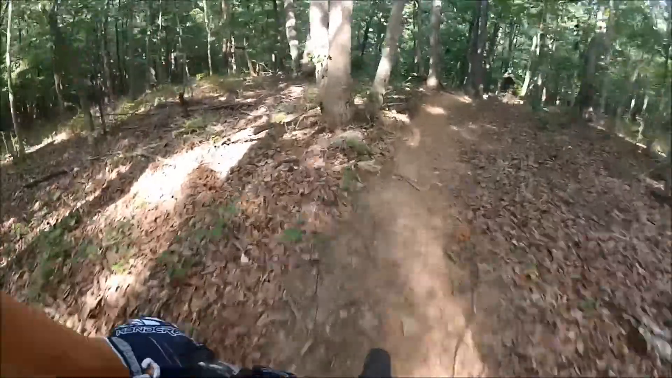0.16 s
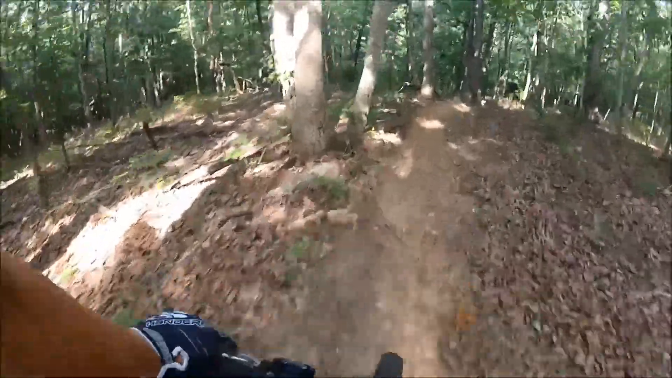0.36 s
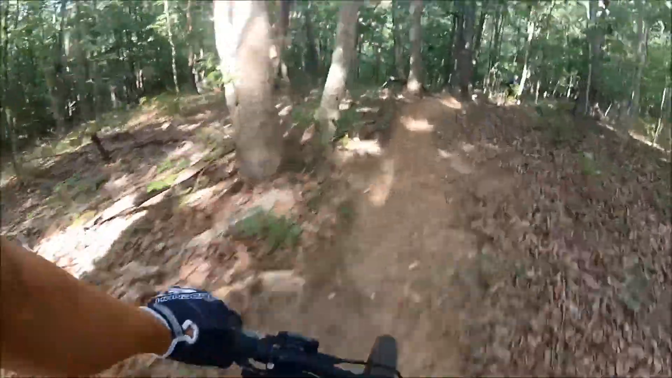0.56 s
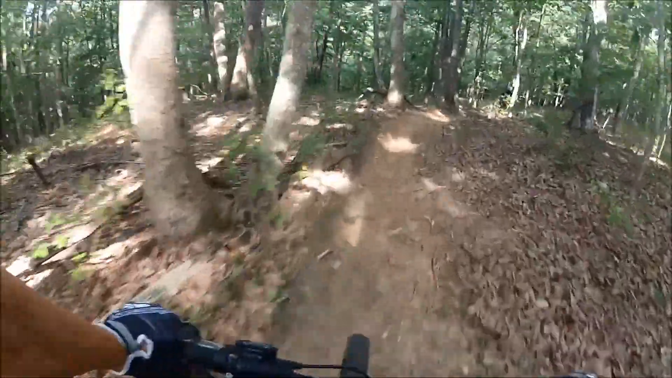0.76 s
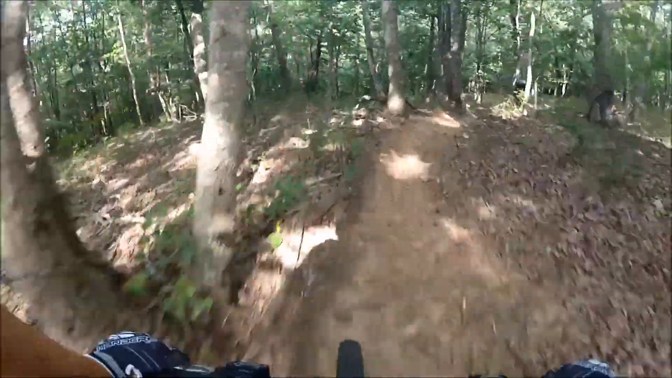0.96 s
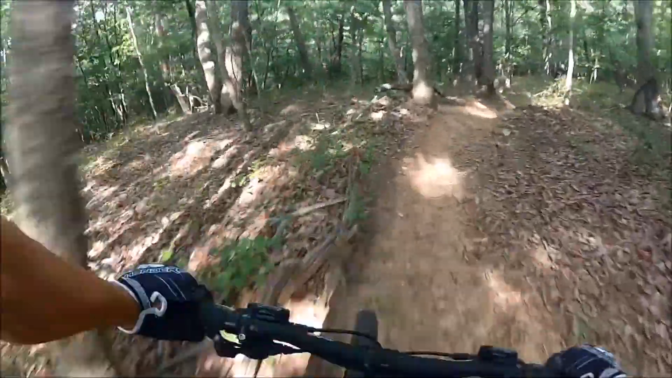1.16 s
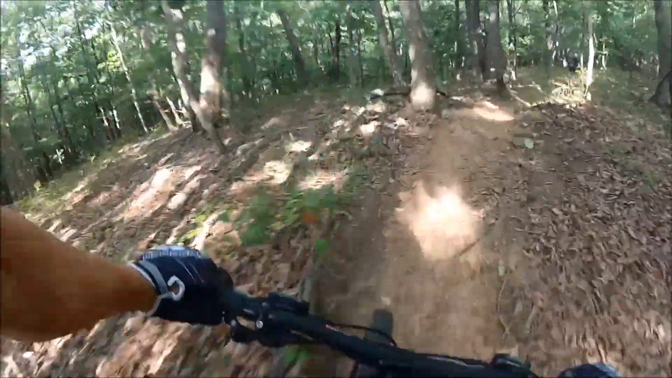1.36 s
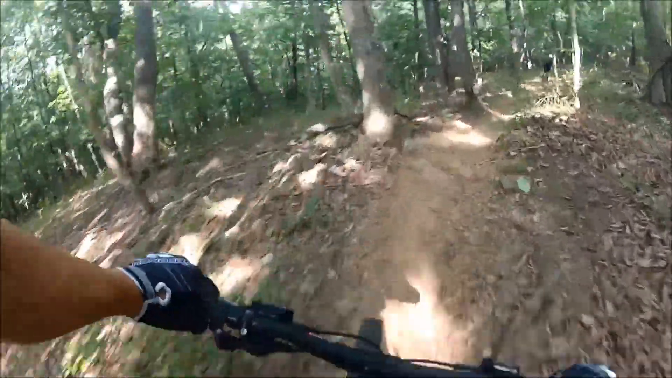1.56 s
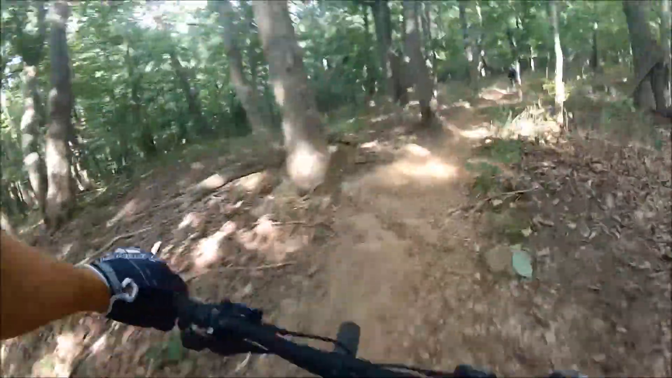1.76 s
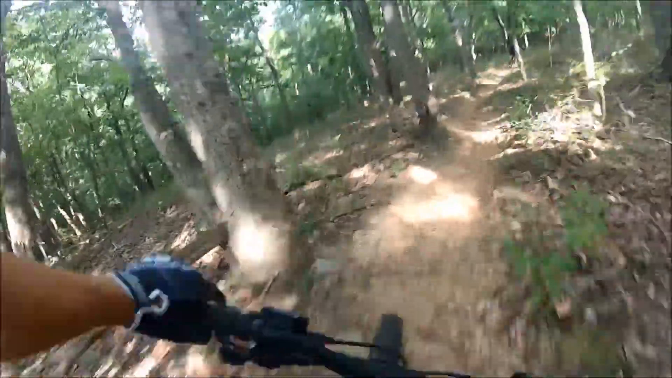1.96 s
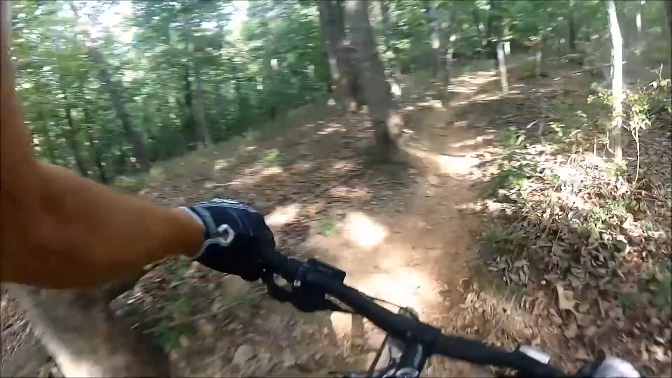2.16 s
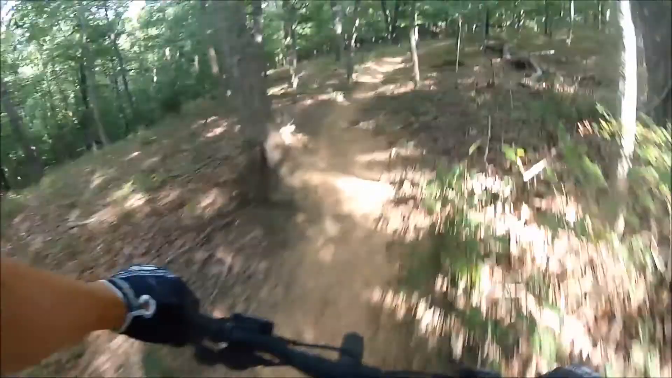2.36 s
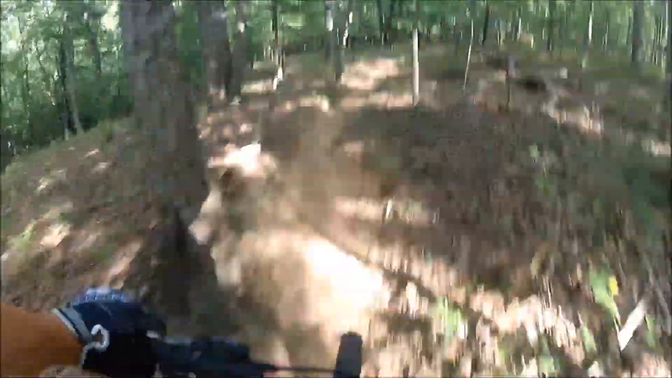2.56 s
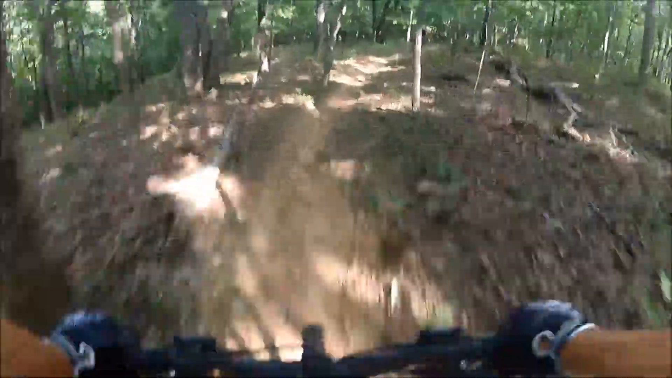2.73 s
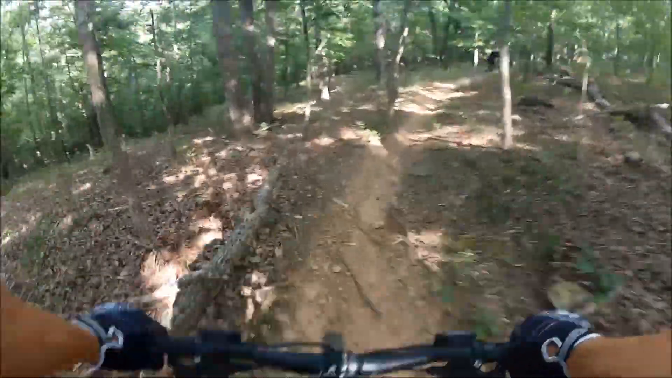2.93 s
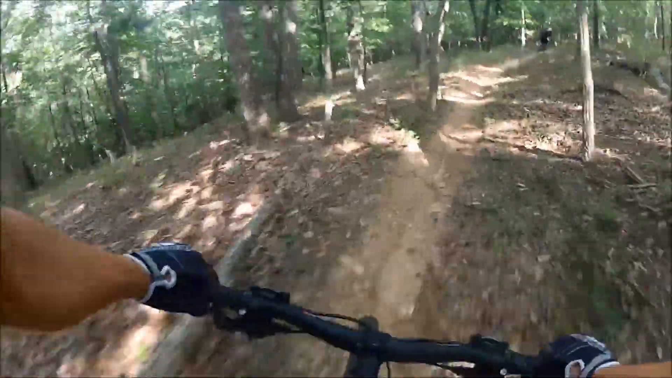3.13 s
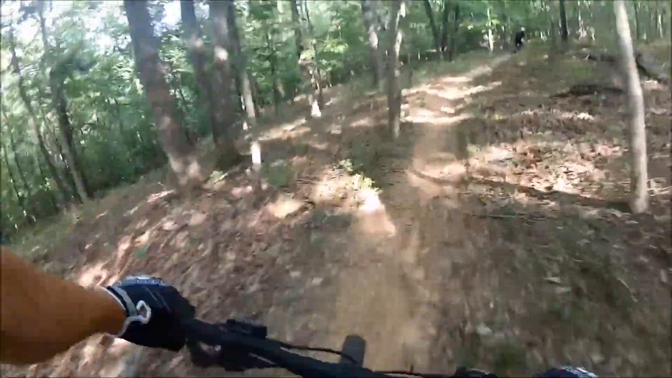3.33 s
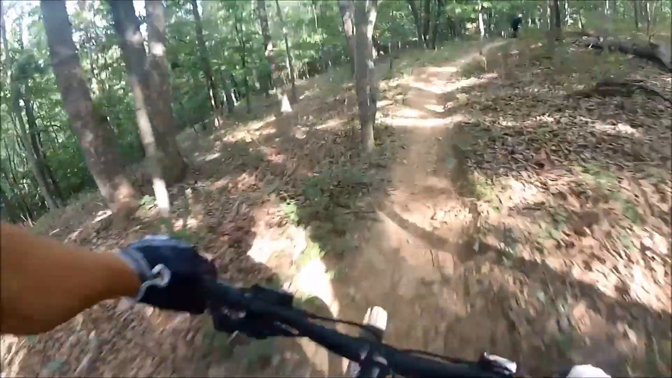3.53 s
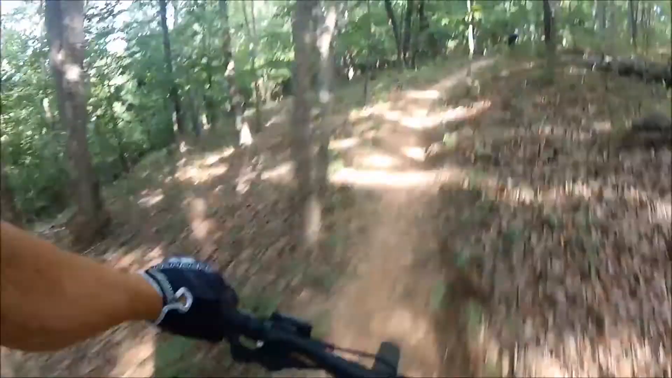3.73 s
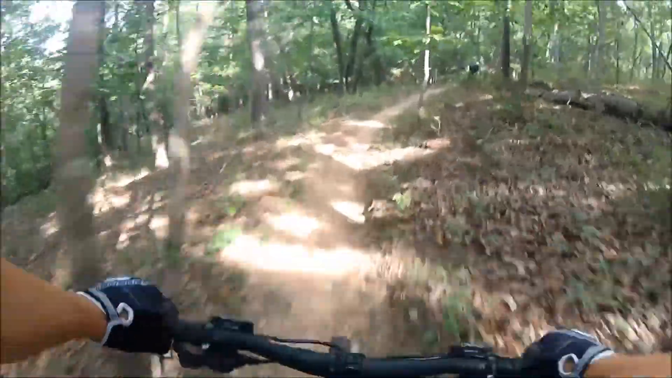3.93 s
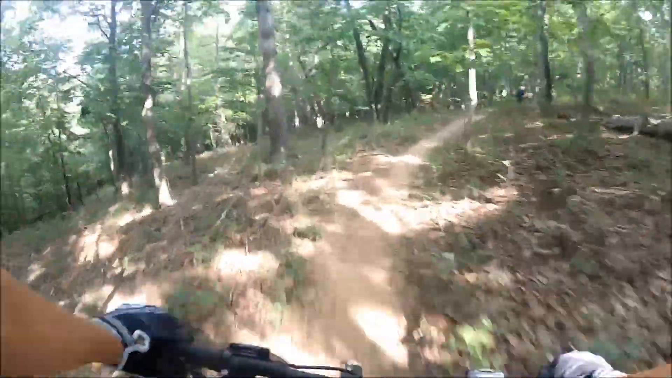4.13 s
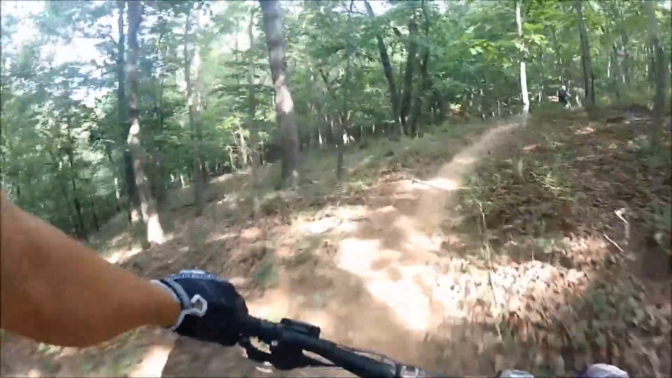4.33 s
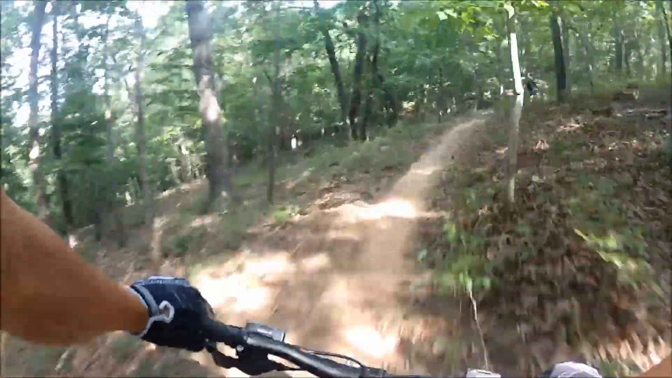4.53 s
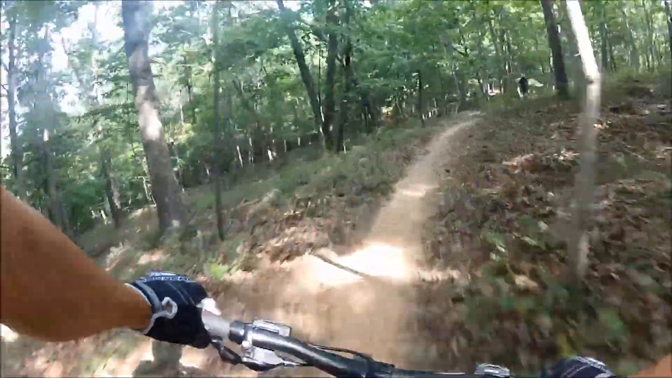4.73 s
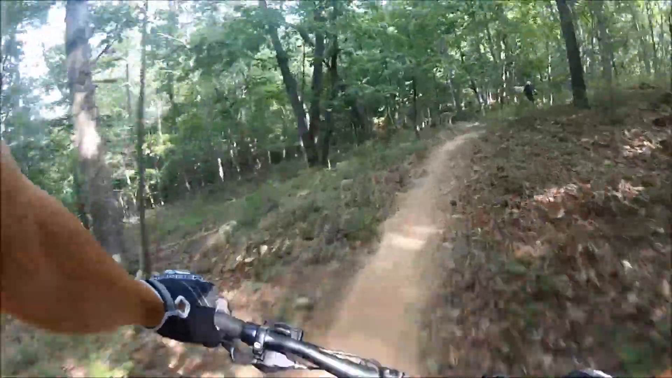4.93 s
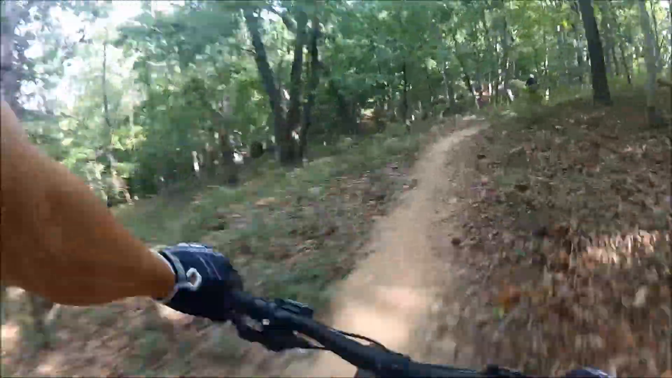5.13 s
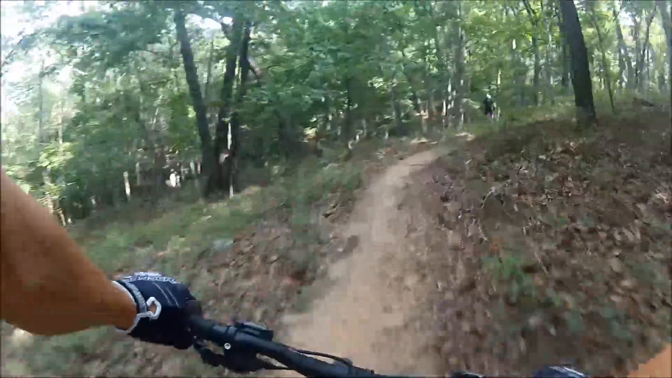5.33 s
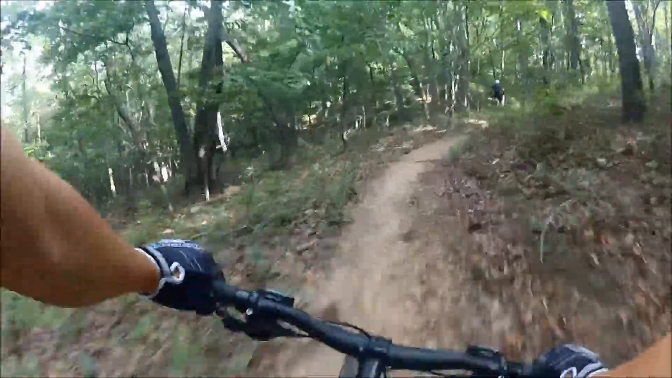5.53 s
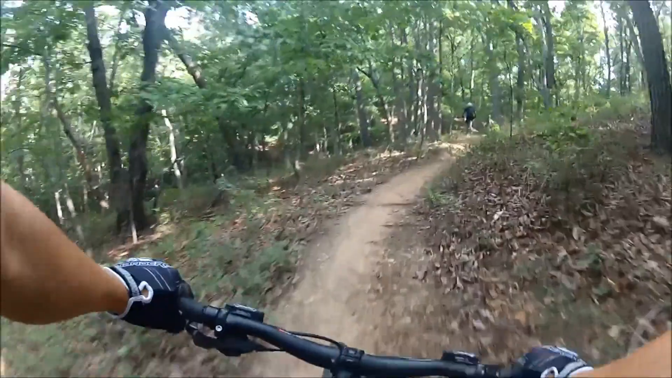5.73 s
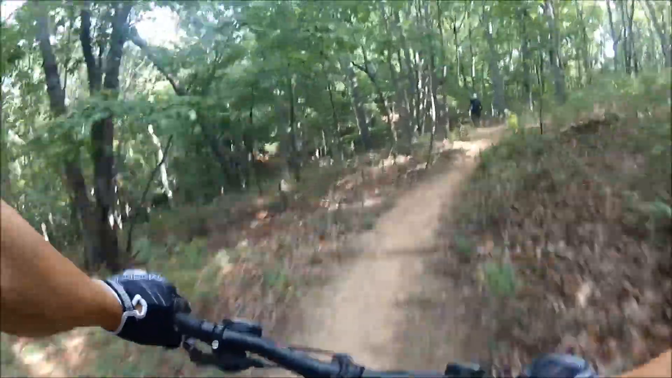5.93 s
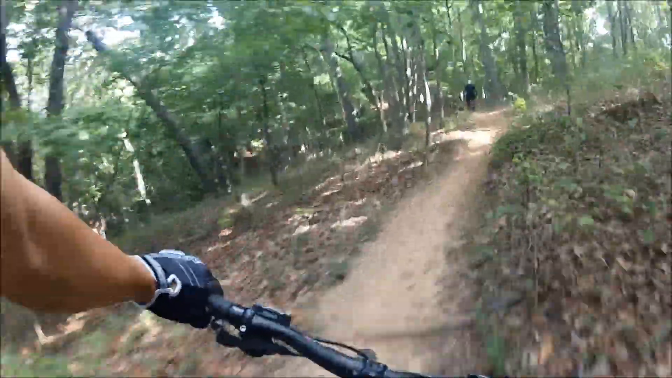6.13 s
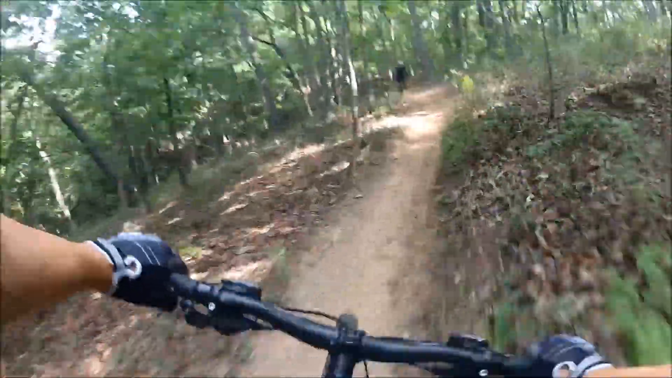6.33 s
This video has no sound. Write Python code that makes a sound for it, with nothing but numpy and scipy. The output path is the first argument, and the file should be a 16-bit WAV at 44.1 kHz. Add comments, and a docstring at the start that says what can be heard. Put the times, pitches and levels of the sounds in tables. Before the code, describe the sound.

A mountain bike descends a dirt forest trail. Gritty tyre crunch opens loud and quickly eases; the loose mount clacks now and then. Around two seconds roots hit in rapid deep thuds, with snapping debris, scuffs and wind buffeting. After more bumps near three seconds it settles into quieter dusty rolling, coasting clicks blurred into a whirr and scattered light knocks. Mono, close, dry, muffled on top.

```python
"""A dirt trail in the woods, ridden downhill on a mountain bike, heard from a microphone worn by the rider.
Tyres: grains and pebbles excite resonances over dust hiss and a lumpy low rumble; splinter bursts snap,
slipping knobs scuff, leaves swish. The freehub whirrs as noisy clicks in spells of coasting.
Roots thump the mount and the loose mount clacks, both as modal blows; wind is low noise with gusts."""
import sys
import numpy as np
from scipy import signal
from scipy.fft import rfft, irfft, next_fast_len
from scipy.io import wavfile

SR = 44100
rng = np.random.default_rng(int(sys.argv[2]) if len(sys.argv) > 2 else 0)


def file_out(sig):
    """Save sig as 16-bit WAV at sys.argv[1]."""
    # one column per channel
    cols = np.atleast_2d(sig).T
    # limit, then scale
    lim = np.clip(cols, -1, 1)
    pcm = np.round(lim * 32767).astype(np.int16)
    wavfile.write(sys.argv[1], SR, pcm)


N = 286209
TIME = np.arange(N) / SR   # s

# resonances of wheel and frame that grit excites: centre_hz, width_hz, level_db
GRIT_MODES = [(705, 670, -15.5), (1047, 175, -3), (1550, 470, -13.5), (1918, 163, 3.5), (2280, 144, 1),
              (2494, 57, 1.5), (2740, 61, -7.5), (3275, 115, -7), (3590, 143, -4), (4630, 810, -15)]


def from_db(db):
    """Decibels to amplitude gain."""
    return 10 ** (np.asarray(db) / 20)


def rms_one(x):
    """Scale to unit rms."""
    return x / np.sqrt(np.mean(x ** 2) + 1e-20)


def curve(rows):
    """Interpolate (time, value) rows linearly at every sample."""
    s, values = np.transpose(rows)
    return np.interp(TIME, s, values)


def add(track, start_s, sound):
    """Mix a sound in at a time."""
    at = max(round(start_s * SR), 0)
    track[at:at + len(sound)] += sound[:max(N - at, 0)]


def drift(rate_hz, step=40, settle=2000):
    """Slow random drift of unit rms: white noise through a double-pole low-pass at a reduced rate."""
    r = np.exp(-2 * np.pi * rate_hz * step / SR)
    white = rng.standard_normal(N // step + settle + 2)
    slow = signal.lfilter([1], [1, -2 * r, r * r], white)[settle:]
    return np.interp(np.arange(N) / step, np.arange(len(slow)), rms_one(slow))


def noise(spectrum):
    """Unit-rms noise shaped by (Hz, dB) points, falling 12 dB per octave outside them."""
    hz, db = np.transpose(spectrum)
    size = next_fast_len(N)
    bins_hz = np.maximum(np.fft.rfftfreq(size, 1 / SR), 1)
    gain = from_db(np.interp(np.log(bins_hz), np.log(hz), db))
    gain *= np.minimum(bins_hz / hz[0], 1) ** 2
    gain *= np.minimum(hz[-1] / bins_hz, 1) ** 2
    return rms_one(irfft(rfft(rng.standard_normal(size)) * gain, size)[:N])


def resonate(x, modes):
    """Parallel two-pole resonances with alternating signs."""
    out = 0
    for k, (hz, width_hz, db) in enumerate(modes):
        r = np.exp(-np.pi * width_hz / SR)
        poles = [1, -2 * r * np.cos(2 * np.pi * hz / SR), r * r]
        band = signal.lfilter([1, 0, -1], poles, x + 1e-18)   # offset avoids denormals
        out = out + (-1) ** k * from_db(db) * (1 - r * r) / 2 * band
    return out


def swells(events):
    """Envelope of Gaussian swells: (centre s, sigma s, peak dB)."""
    return sum(from_db(db) * np.exp(-.5 * ((TIME - s) / sigma_s) ** 2) for s, sigma_s, db in events)


def by_chance(per_s, db, spread_db=2.0, count=64):
    """Small events at random moments: (s, dB), with exponential gaps and uniform level spread."""
    draws = rng.random((count, 2))
    times_s = np.cumsum(-np.log(1 - draws[:, 0]) / per_s)
    return [(s, db + spread_db * (2 * u - 1)) for s, u in zip(times_s, draws[:, 1]) if s < N / SR]


def grit(modes, per_s, size_spread_db, patchy_db, patch_rate_hz):
    """Grains crack under the knobs, sizes spread exponentially in dB; each favours other resonances."""
    falls = rng.random(N) < per_s / SR
    sizes = from_db(size_spread_db * np.minimum(rng.exponential(1, N), 4)) * falls
    out = 0
    for mode in modes:
        strength = rng.standard_normal(N) * from_db(patchy_db * drift(patch_rate_hz))
        out = out + resonate(sizes * strength, [mode])
    return rms_one(out)


def blows(events, modes, lag_at_100hz_s, vary_db=1.5, low_cut_hz=22, size=8192):
    """Blows on a body, each favouring other modes; bending waves carry highs faster: a downward chirp."""
    hz = np.fft.rfftfreq(size, 1 / SR)
    rings = []
    for k, (mode_hz, db, t60_s) in enumerate(modes):
        damped = 2j * np.pi * hz + np.log(1000) / t60_s
        rings.append((-1) ** k * from_db(db) * mode_hz / (damped ** 2 + (2 * np.pi * mode_hz) ** 2))
    rings = np.array(rings)
    travel = np.exp(-4j * np.pi * lag_at_100hz_s * np.sqrt(100 * hz))   # delay goes as 1 / sqrt(hz)
    radiated = 1j * hz / (1j * hz + low_cut_hz)
    strengths = from_db(vary_db * rng.standard_normal((len(events), len(modes))))
    out = np.zeros(N)
    for (s, peak_db, contact_hz), strength in zip(events, strengths):
        contact = 1 / (1 + 1j * hz / contact_hz) ** 2   # a soft contact is dull
        blow = irfft(strength @ rings * travel * radiated * contact)
        add(out, s, from_db(peak_db) * blow / np.abs(blow).max())
    return out


def tyres(grip_db, clump_db=2.0, clump_rate_hz=45, grit_db=-1.0, pebble_db=-7.5, dust_db=-6.0):
    """Coarse grit and pebbles come in clumps over the smoother hiss of dust."""
    # dust hiss: freq_hz, density_db
    dust = [(300, -2), (550, 3.5), (950, 0.5), (1300, -2.5), (1900, 3.5), (2500, -19), (3000, -11.5),
            (3700, 2.5), (4300, -25), (5800, -17)]
    crunch_db = -55 + 0.97 * grip_db   # level at average grip; share of its swing
    clumps = rms_one(from_db(clump_db * drift(clump_rate_hz)))
    coarse = from_db(grit_db) * grit(GRIT_MODES, per_s=2200, size_spread_db=2.0, patchy_db=4.5,
                                     patch_rate_hz=22.5)
    stones = from_db(pebble_db) * pebbles()
    fine = from_db(dust_db) * noise(dust)
    return from_db(crunch_db) * (clumps * (coarse + stones) + fine)


def pebbles(per_s=260, low_hz=1600, high_hz=3900, width_hz=70, tilt_db=-4.5, count=24):
    """Small stones tick on the wheels, each ringing briefly at one of a fan of pitches."""
    ticks = rng.standard_normal(N) * (rng.random(N) < per_s / SR)
    dealt = rng.integers(0, count, N)
    pitches_hz = np.geomspace(low_hz, high_hz, count)
    levels_db = np.linspace(0, tilt_db, count)
    out = 0
    for k, (hz, db) in enumerate(zip(pitches_hz, levels_db)):
        out = out + resonate(ticks * (dealt == k), [(hz, width_hz, db)])
    return rms_one(out)


def rumble(lump_db=4.0, lump_rate_hz=14):
    """Uneven ground shakes the tyres: low noise in lumps, louder on rougher stretches."""
    # tyre rumble: freq_hz, density_db
    spectrum = [(40, -5), (70, -5), (110, 1.5), (170, -0.5), (270, -5.5), (380, -12), (550, -17.5),
                (950, -22), (1300, -30.5), (3000, -39)]
    # rumble on rougher and smoother ground: time_s, level_db
    ground = [(0.0, -43), (0.42, -48.5), (0.78, -46), (1.15, -50.5), (2.1, -45.5), (2.35, -39),
              (2.55, -42.5), (3.2, -45.5), (3.6, -47.5), (3.9, -44.5), (4.4, -51), (4.9, -46), (5.3, -44.5),
              (5.8, -46), (6.49, -43)]
    lumps = from_db(lump_db * drift(lump_rate_hz))
    return from_db(curve(ground)) * rms_one(noise(spectrum) * lumps)


def snaps(grip_db, t60_s=0.031, ring_db=-3.0, size=2048):
    """Stones and twigs snap: each a decaying noise burst through a wheel ring and a sharp crack."""
    # snaps under the tyres: start_s, level_db, crack_db (relative)
    events = [(0.0508, -28, -11), (0.0654, -33, -7), (0.2718, -40, -5), (0.5691, -37, -18),
              (1.0615, -32.5, -23), (1.1553, -35, -22), (1.4301, -35.5, -9), (1.996, -32, -28),
              (2.1819, -35, -26), (2.2284, -31.5, -12), (2.2573, -33.5, -4.5), (2.2977, -26, -28),
              (2.4843, -38, -2), (2.5152, -27.5, -21), (2.58, -34, -8), (2.606, -34, -3),
              (2.7317, -34, -10), (2.8689, -35.5, -18), (3.0624, -33.5, -16), (3.249, -33, -24),
              (3.3767, -31.5, -25), (3.4376, -30, -8), (3.5803, -32, -19), (3.8761, -32.5, -30)]
    # sharp crack: centre_hz, width_hz, level_db
    crack_modes = [(4260, 1350, 0.02), (5500, 2500, -2)]
    chips = [(s, db + grip_db[int(s * SR)], -18) for s, db in by_chance(per_s=4.0, db=-41.5)]
    events = list(events) + chips
    decay = from_db(-60 * TIME[:size] / t60_s)
    out = np.zeros(N)
    for (s, level_db, crack_db), splinters in zip(events, rng.standard_normal((len(events), size))):
        burst = splinters * decay
        ring = resonate(burst, GRIT_MODES)
        crack = resonate(burst, crack_modes)
        sound = from_db(ring_db) * ring / np.abs(ring).max()
        sound += from_db(crack_db) * crack / np.abs(crack).max()
        add(out, s, from_db(level_db) * sound)
    return out


def scuffs(per_s=1800):
    """Slipping knobs grind many grains at once: dense grit in short swells."""
    # slips: centre_s, sigma_s, peak_db
    slips = [(.1, 0.015, -42.5), (.177, 0.017, -43), (.552, 0.013, -50.5), (1.587, 0.0042, -45.5),
             (1.935, .0084, -47), (2.292, 0.018, -39.5), (2.345, .012, -43), (2.399, 0.0064, -42.5),
             (2.519, 0.014, -51), (2.604, 0.038, -44.5), (2.84, .015, -47), (3.012, 0.015, -46.5),
             (3.073, 0.011, -44.5), (3.32, 0.0086, -43), (3.475, 0.027, -46), (5.582, 0.015, -47),
             (5.958, 0.01, -46), (6.023, 0.015, -46), (6.117, 0.024, -49.5), (6.316, 0.0043, -43),
             (6.441, 0.012, -44)]
    # scuff resonances: centre_hz, width_hz, level_db
    modes = [(600, 470, -2.5), (1010, 140, -6.5), (1450, 200, -4.5), (1840, 140, 1.5), (2326, 48, -0.5),
             (2840, 170, -9), (3170, 69, -6), (3586, 94, -2)]
    return swells(slips) * grit(modes, per_s, size_spread_db=0.0, patchy_db=3.0, patch_rate_hz=56)


def thuds():
    """Roots and bumps jolt the mount, which rings in damped low modes."""
    # jolts: start_s, peak_db, contact_cutoff_hz
    jolts = [(0.329, -29, 70), (0.7805, -12.5, 138), (1.955, -9.5, 240), (2.187, -6, 206),
             (2.2346, -17, 70), (2.2623, -8.5, 377), (2.2801, -20, 400), (2.3, -18, 70),
             (2.3295, -9.5, 205), (2.3596, -18.5, 70), (2.3814, -6, 296), (2.8276, -25, 171),
             (2.9397, -12.5, 220), (3.1333, -14, 239), (3.3112, -25.5, 340)]
    # mount modes: freq_hz, level_db, t60_s
    modes = [(101.2, -2.5, 0.056), (170, 5.5, 0.0075), (279.5, -2.5, 0.035), (600, -21.5, 0.018),
             (750, -25.5, 0.033), (1087, -20, 0.077)]
    return blows(jolts, modes, lag_at_100hz_s=0.00338)


def clacks(ref_hz=1070, ref_db=-25.5, db_per_octave=5.0):
    """Short, bright knocks of the microphone mount; the harder the hit, the brighter the contact."""
    # knocks: start_s, peak_db
    knocks = [(0.2589, -29.5), (0.7635, -19.5), (0.9335, -21), (1.1946, -19), (1.317, -19.5), (1.3705, -27),
              (1.5219, -30.5), (1.6009, -31), (1.6598, -18.5), (1.9562, -20.5), (2.1056, -26.5),
              (2.1885, -23), (2.383, -23), (2.7906, -31), (3.4117, -25), (4.1549, -26), (4.3272, -22.5),
              (4.592, -22), (4.7756, -23.5), (4.8399, -26.5), (5.1106, -28), (5.1607, -28.5),
              (5.4834, -26.5), (5.7414, -24), (5.8882, -29.5), (5.9291, -28.5), (6.2464, -27),
              (6.3129, -23), (6.3739, -27)]
    # clack modes: freq_hz, level_db, t60_s
    modes = [(138, -4.5, 0.039), (277, -3.5, 0.032), (480, 1.3, 0.0045), (917, -5.5, 0.0095),
             (1870, -9.5, 0.0052)]
    knocks = list(knocks) + by_chance(per_s=2.0, db=-36)   # faint clacks in between
    events = [(s, db, ref_hz * 2 ** ((db - ref_db) / db_per_octave)) for s, db in knocks]
    return blows(events, modes, lag_at_100hz_s=.0011)


def freehub(clicks_per_s=420, wobble=.08, click_decay=2.4, patchy_db=2.5, patch_rate_hz=20):
    """Pawls skip over the ratchet so fast that the clicks blur to a whirr of shifting colour."""
    # hub resonances: centre_hz, width_hz, level_db
    modes = [(930, 130, 2), (1926, 170, 0), (2280, 106, 4), (2482, 110, 3), (2760, 47, -11.5),
             (3615, 81, -2.5)]
    teeth = np.cumsum(clicks_per_s * (1 + wobble * drift(2))) / SR
    scrapes = np.exp(-click_decay * (teeth % 1))   # decay per click period
    out = 0
    for mode in modes:
        band = resonate(scrapes * rng.standard_normal(N), [mode])
        out = out + band * from_db(patchy_db * drift(patch_rate_hz))
    return rms_one(out)


def coasting(rise_s=0.25, fade_s=0.17):
    """Freehub gain: the rider stops pedalling, and each spell rises, holds and fades exponentially."""
    # coasting spells: start_s, end_s, level_db
    spells = [(0.0, 0.5, -61.5), (1.75, 2.044, -54.5), (2.9, 3.96, -56.5), (4.203, 4.798, -53),
              (5.357, 5.9, -57.5)]
    gains = []
    for start_s, end_s, db in spells:
        rise = np.minimum(TIME - start_s, 0) / rise_s
        fade = np.maximum(TIME - end_s, 0) / fade_s
        gains.append(from_db(db) * np.exp(rise - fade))
    return np.max(gains, axis=0)


def leaves():
    """Dry leaves swish past the wheels, each a thin hiss."""
    # swishes: centre_s, sigma_s, peak_db
    swishes = [(2.436, 0.0072, -53), (2.859, .003, -48), (3.97, 0.012, -62), (4.022, 0.0049, -55),
               (6.4, 0.016, -55), (6.443, 0.0054, -46.5)]
    # leaf hiss: freq_hz, density_db
    spectrum = [(3000, -28), (4500, -2), (5500, 2), (5900, 2)]
    return swells(swishes) * noise(spectrum)


def wind(grip_db, flutter_db=2.0, flutter_rate_hz=6, gust_sigma_s=0.037):
    """The headwind flutters on the microphone and swells in gusts."""
    # wind: freq_hz, density_db
    spectrum = [(15, -1.5), (25, 3), (38, -4), (70, -12.5), (120, -14.5), (300, -48)]
    # gusts: centre_s, peak_db
    gust_rows = [(0.35, -41), (1.25, -39), (1.75, -39), (2.24, -35), (2.38, -24), (2.73, -31),
                 (2.97, -31.5), (3.13, -38), (3.33, -32.5), (3.56, -43), (5.04, -34), (5.67, -38),
                 (6.03, -40.5)]
    steady_db = -46.5 + 0.5 * grip_db   # level at average grip; share of its swing
    steady = from_db(steady_db + flutter_db * drift(flutter_rate_hz))
    gusts = swells([(s, gust_sigma_s, db) for s, db in gust_rows])
    return np.hypot(steady, gusts) * noise(spectrum)


def scene():
    """All sources travel with the rider, close and dry; crunch, small snaps and wind rise with grip."""
    # how hard the tyres work the dirt (only the swing about the mean counts): time_s, level_db
    grip = [(0.0, -62.5), (0.03, -64.5), (0.2, -70.5), (0.81, -71), (1.57, -71), (2.02, -68), (2.28, -64),
            (2.4, -62.5), (2.82, -66.5), (3.07, -68), (3.49, -68), (4.1, -71), (4.43, -69.5), (4.77, -71),
            (5.04, -73.5), (6.49, -70)]
    grip_db = curve(grip)
    grip_db = grip_db - grip_db.mean()
    trail = tyres(grip_db) + rumble() + snaps(grip_db) + scuffs() + leaves()
    bike_and_mount = thuds() + clacks() + coasting() * freehub()
    return (trail + bike_and_mount + wind(grip_db))[None]


def record(dry):
    """Hold the sound in steps at 12 kHz, which mirrors it faintly into the treble; then cut the top."""
    narrow_sos = signal.ellip(10, .1, 70, 5860, fs=SR, output="sos")
    narrow = signal.sosfiltfilt(narrow_sos, dry)
    at_48khz = signal.resample_poly(narrow, 160, 147, axis=1)
    steps = np.repeat(at_48khz[:, ::4], 4, axis=1)
    held = signal.resample_poly(steps, 147, 160, axis=1)[:, :N]
    top_cut_sos = signal.ellip(10, .1, 80, 15250, fs=SR, output="sos")
    return signal.sosfilt(top_cut_sos, held)


dry = scene()
out = record(dry)
file_out(out)
```